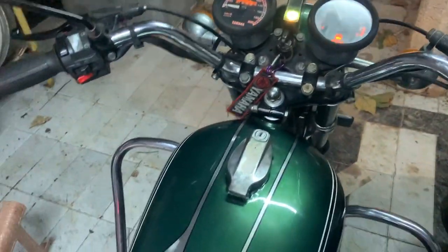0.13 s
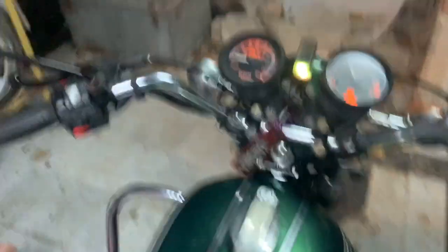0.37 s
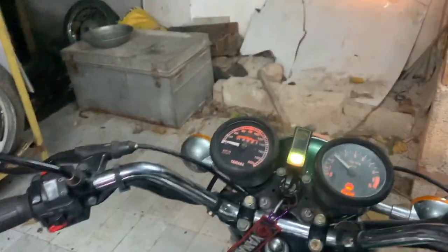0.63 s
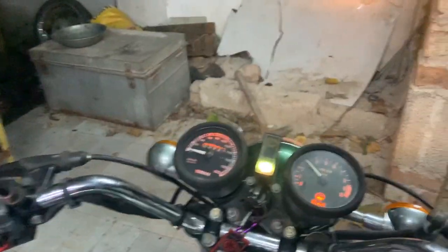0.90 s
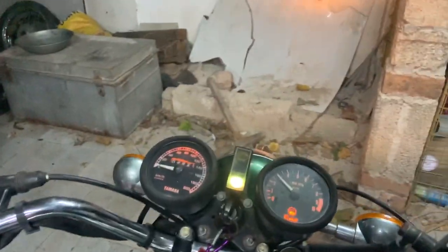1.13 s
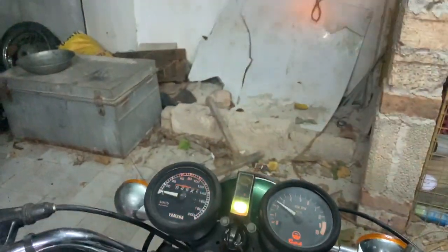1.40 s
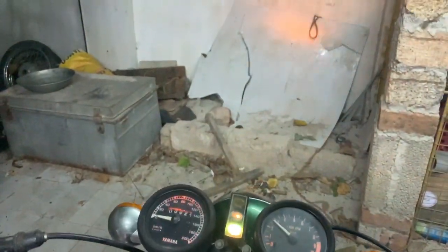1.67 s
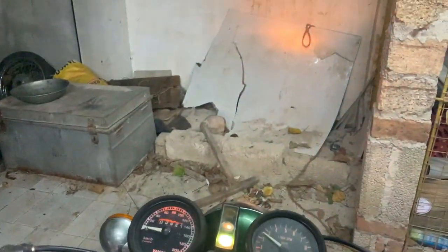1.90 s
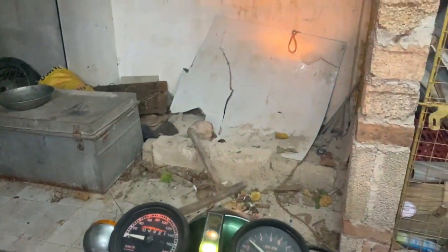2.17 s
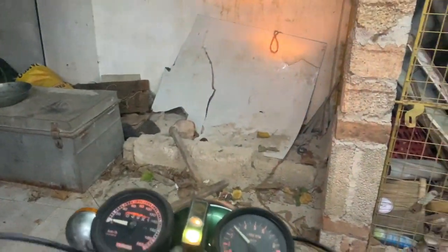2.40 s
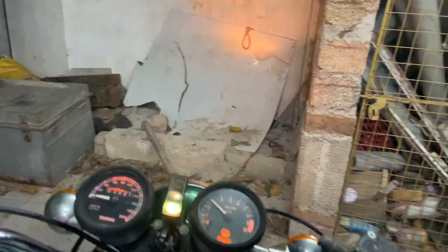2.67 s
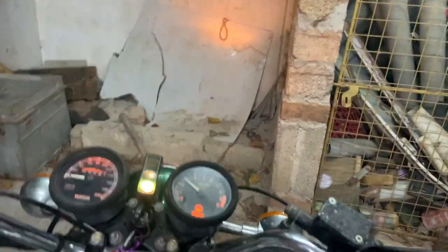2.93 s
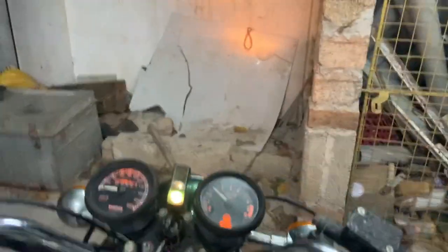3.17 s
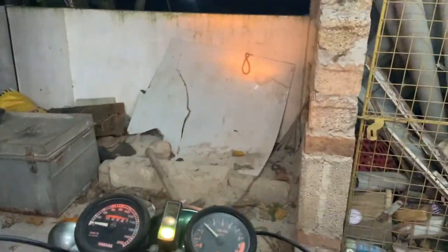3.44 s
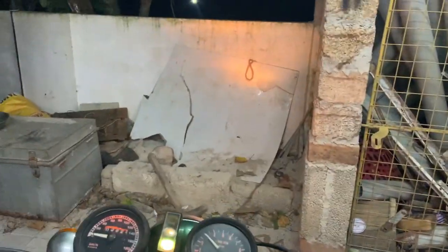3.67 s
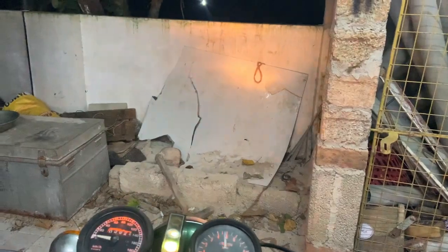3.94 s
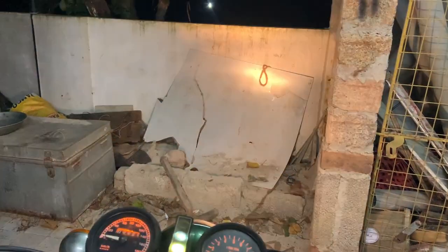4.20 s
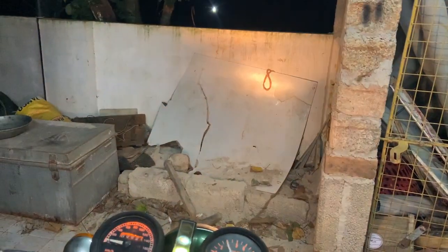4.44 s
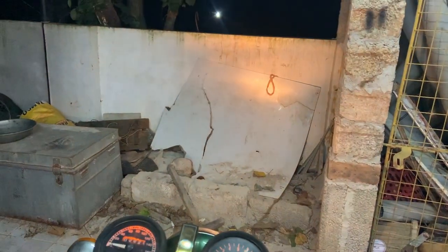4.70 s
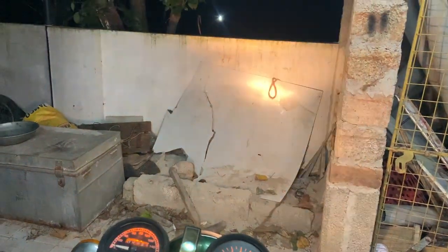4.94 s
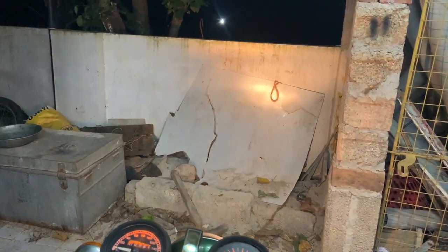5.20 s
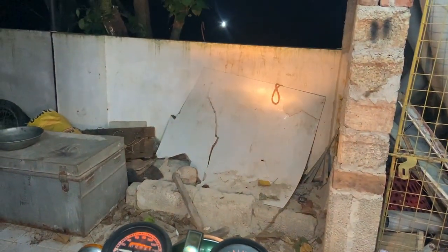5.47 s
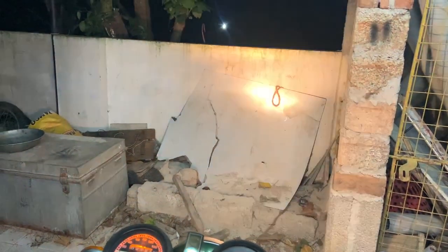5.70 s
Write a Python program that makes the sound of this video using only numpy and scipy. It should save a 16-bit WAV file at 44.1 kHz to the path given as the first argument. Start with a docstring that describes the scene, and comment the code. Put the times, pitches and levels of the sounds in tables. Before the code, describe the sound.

Close to a small two-stroke motorcycle in a walled yard, the engine drops from a brisk idle to a slow, lumpy one with irregular pops, metallic fin rattle and light hiss. Near four seconds the throttle is blipped three times, each a loud barking, rasping surge. A hand-held phone hears it close, with short wall echo and clipping on the peaks.

```python
"""A small single-cylinder two-stroke in a walled yard, close to a hand-held phone, over a low rumble.
From the start it slows: exhaust puffs ring the pipe, slap and chatter shake fins and case, gas jets hiss.
At idle it fires only every few turns: each firing rings the fins, thumps and spits a crack from the tail pipe.
Then three throttle blips: the intake barks in its air box, the exhaust rasps, the fins rattle harder and the
recorder clips; the speed is still high at the end. A short, diffuse yard echo follows throughout."""
import sys
import numpy as np
from scipy import signal
from scipy.fft import rfft, irfft, next_fast_len
from scipy.io import wavfile
from scipy.ndimage import uniform_filter1d, map_coordinates

SR = 44100
rng = np.random.default_rng(int(sys.argv[2]) if len(sys.argv) > 2 else 0)


def boost_factor(decibels):
    """Convert a level in decibels to a linear amplitude factor."""
    exponent = np.asarray(decibels, float) / 20
    return 10 ** exponent


def transcribe(signal):
    """Save signal, clipped to [-1, 1], as a 16-bit WAV file at the path in sys.argv[1]."""
    frames = np.atleast_2d(signal).T
    limited = np.clip(frames, -1, 1)
    pcm = np.round(limited * 32767).astype(np.int16)
    wavfile.write(sys.argv[1], SR, pcm)


N = 257544
IDLE_HZ = 33


def unit(x):
    """Scale to rms 1."""
    return x / np.sqrt(np.mean(x ** 2) + 1e-20)


def along(points, hz, axis=1):
    """A column of (f/Hz, value, ..) points, read on a log frequency axis."""
    points = np.array(points)
    return np.interp(np.log(hz + 1), np.log(points[:, 0] + 1), points[:, axis])


def curves(rows):
    """One value per sample for each column after t/s."""
    s, *cols = np.transpose(rows)
    return [np.interp(np.arange(N) / SR, s, c) for c in cols]


def wobble(rate_hz):
    """A smooth random curve, rate_hz knots a second."""
    coarse = np.arange(0, N + 8, 8)
    knots = rng.standard_normal(int(N * rate_hz / SR) + 4)
    return np.interp(np.arange(N), coarse, map_coordinates(knots, [coarse * rate_hz / SR]))


def filtered(x, response):
    """x times a complex response of frequency."""
    m = next_fast_len(N + SR // 2)
    return irfft(rfft(x, m) * response(np.fft.rfftfreq(m, 1 / SR)), m)[..., :N]


def modes(table, flip=-1):
    """Causal response of resonances; flip = -1 fills the valleys between them, 1 leaves deep notches."""
    def response(f):
        total = 0
        for k, (center, width, db) in enumerate(table):
            damping = 1j * f * width
            total = total + flip ** k * boost_factor(db) * damping / (center * center - f * f + damping)
        return total
    return response


def steady(x):
    """Even out the slow level of x, so that a level curve alone sets it."""
    return x / np.sqrt(np.abs(uniform_filter1d(x ** 2, size=SR // 5)) + 1e-12)


# shaft before the kicks of lone firings: (t/s, f/Hz)
SHAFT_SPEED = [(0, 55.6), (.31, 46.2), (.48, 40.7), (.7, 36.5), (1.19, 32.2), (2.14, 32.4), (2.76, 35.2),
               (3.0, 33), (3.38, 36.5), (3.72, 35), (3.8, 44.3), (3.93, 77.2), (3.99, 90.7), (4.05, 99.4),
               (4.12, 96.8), (4.37, 83.1), (4.44, 81.5), (4.71, 67), (4.76, 72.3), (4.87, 91.2),
               (4.91, 95.3), (4.98, 99.4), (5.12, 96.6), (5.37, 85), (5.53, 75.8), (5.58, 79.3),
               (5.69, 92.7), (5.77, 99.4), (5.84, 96.1)]


def shaft_speed():
    """Shaft turns a second, without the kicks."""
    return curves(SHAFT_SPEED)[0]


def crank(speed_hz, kick_hz, fade_s):
    """Shaft angle in turns: each lone firing speeds the shaft up, a slow shaft most, and drag slows it again."""
    t = np.arange(N) / SR
    kicks = sum((t > s) * np.exp(-np.abs(t - s) / fade_s) for s, *_ in FIRINGS)
    kicks = kicks - uniform_filter1d(kicks, size=SR // 4)
    return np.cumsum(speed_hz + kick_hz * (IDLE_HZ / speed_hz) ** 2 * kicks) / SR


# throttle twists: (t/s, rise/s, held/s, opening 0-1)
TWISTS = [(3.76, 0.13, 0.083, .95), (4.68, 0.061, 0.11, 1.0), (5.44, 0.15, 0.14, .88)]
SNAP_SHUT_S, SAG_SHARE = .1, 0.31


def throttle():
    """Opening 0-1: the grip turns, sags a little while held and snaps shut."""
    t = np.arange(N) / SR
    total = np.zeros(N)
    for s, rise_s, held_s, opening in TWISTS:
        corners = np.cumsum([s, rise_s, held_s, SNAP_SHUT_S])
        total += opening * np.interp(t, corners, [0, 1, 1 - SAG_SHARE, 0])
    return total


# firing falters below MISFIRE_HZ, and when a slow engine gulps air
MISFIRE_HZ, MISFIRE_SPREAD_HZ, CHOKE_HZ = 36.5, 2.5, 38
# (even running, faltering)
SIZE_DB, SLIP_TURNS, TUMBLE_DB = (1.6, 4.2), (.008, .03), (2, 15)


def unevenness():
    """Size scatter/dB, timing scatter/turns and tumbling gas/dB all grow as the firing falters."""
    speed = shaft_speed()
    slow = 1 / (1 + np.exp((speed - MISFIRE_HZ) / MISFIRE_SPREAD_HZ))
    choked = np.sqrt(throttle()) * (CHOKE_HZ / speed) ** 2
    falter = np.clip(slow + choked, 0, 1)
    return [even + (rough - even) * falter for even, rough in (SIZE_DB, SLIP_TURNS, TUMBLE_DB)]


def port_pulses(angle, offset_turns):
    """One puff a turn as a port opens, uneven in size and timing."""
    size_db, slip, _ = unevenness()
    at = np.flatnonzero(np.diff(np.floor(angle + offset_turns))) + 1
    chance = rng.standard_normal((N // 100, 2))[:len(at)]
    period = np.gradient(at)
    when = np.clip(at + chance[:, 0] * slip[at] * period, 0, N - 1).astype(int)
    return np.bincount(when, boost_factor(chance[:, 1] * size_db[at]), N)


# exhaust modes: (f/Hz, level/dB)
PIPE_MODES = [(96, -2), (143, 2), (171, -5.5), (199, -5.5), (281, -1), (335, -1.5), (374, -9.5),
              (400, -18.5), (445, -20.5), (490, -28), (562, -12), (640, -15), (750, -10.5), (870, -5),
              (965, -11)]


def pipe(f):
    """The exhaust rings long in its low modes, shorter in the high ones; little leaves it below the first."""
    lightly_damped = [(hz, 7 + .035 * hz, db) for hz, db in PIPE_MODES]
    return modes(lightly_damped, flip=1)(f) * (1j * f / (1j * f + 62)) ** 3


# exhaust puffs: (t/s, level/dB)
PUFF_LEVEL = [(0, -19.5), (.3, -21), (.7, -22), (1.2, -23), (2.2, -23), (2.5, -19), (3.0, -21), (3.45, -19),
              (3.72, -20.5), (3.95, -9.5), (4.1, -16), (4.36, -18), (4.62, -12), (4.75, -16), (4.94, -8),
              (5.05, -14.5), (5.3, -19.5), (5.5, -14), (5.62, -12.5), (5.77, -7.5), (5.84, -14.5)]
# shape of one turn's flow: (multiple of shaft speed, level/dB)
PUFF_SHAPE = [(1, -5.5), (2, 2.5), (3, -2.5), (4, 1), (5, 0.5), (6, -2), (7, -0.5), (8, -5.5), (9, -14),
              (10, -10), (11, -11.5), (12, -10), (13, -17), (14, -6.5)]
# tail pipe under load: (f/Hz, width/Hz, level/dB)
RASP_MODES = [(1273, 97, -3), (1394, 50, 1), (1654, 150, 2.5), (2084, 53, -1.5)]


def exhaust(angle, rasp_db):
    """Each turn's flow rings the pipe, with tumbling gas when uneven; under load its sharp front rasps."""
    size_db, slip, tumble_db = unevenness()
    shaky = 2 * np.pi * (angle + slip * wobble(30))
    flow = np.zeros(N)
    for k, db in PUFF_SHAPE:
        # flow shape changes turn to turn: every multiple wavers on its own
        own_level = boost_factor(size_db * wobble(12))
        flow += boost_factor(db) * own_level * np.cos(k * shaky + .3 * size_db * wobble(9))
    flow *= boost_factor(.5 * size_db * wobble(18))
    dull_noise = filtered(rng.standard_normal(N), lambda f: boost_factor(3) / (1 + 1j * f / 260) ** 2)
    tumble = boost_factor(tumble_db) * dull_noise
    fronts = port_pulses(angle, 0) + boost_factor(-36) * rng.standard_normal(N)
    rasp = boost_factor(rasp_db) * steady(filtered(fronts, modes(RASP_MODES)))
    puff_db = curves(PUFF_LEVEL)[0]
    return filtered(np.sqrt(2) * boost_factor(puff_db) * (flow + tumble), pipe) + rasp


# cooling fins: (f/Hz, width/Hz, level/dB)
FIN_MODES = [(925, 78, -6), (1020, 90, -4), (1207, 75, -2), (1338, 78, -10.5), (1737.5, 22.7, 2),
             (1865, 33, 1.5), (1932, 200, -2.5), (2320, 136, -7.5), (2640, 170, -10), (3080, 160, -18.5),
             (3760, 96, -41)]
# broad case clatter, spectrum shape: (f/Hz, level/dB)
CASE_SPECTRUM = [(300, -61), (520, -6), (900, -6), (1300, -11.5), (2000, -15.5), (2500, -15.5),
                 (4000, -21.5), (6000, -30.5)]


def rattle(angle, speed_hz, level_db):
    """Piston slap and gear chatter, swelling once a turn, shake the case; at speed the fins ring more."""
    beat = boost_factor(2 * np.cos(2 * np.pi * angle) + 0.74 * wobble(24.88) + 3.13 * wobble(120))
    ring = unit(filtered(beat * rng.standard_normal(N), modes(FIN_MODES)))
    broad = unit(filtered(beat * rng.standard_normal(N), lambda f: boost_factor(along(CASE_SPECTRUM, f))))
    slap = unit(filtered(port_pulses(angle, .7), modes(FIN_MODES)))
    fins = unit(ring + boost_factor(-5) * slap)
    fin_share = np.clip(0.32 + 0.0073 * (speed_hz - 35), .05, .95)  # of the power
    return boost_factor(level_db) * (np.sqrt(fin_share) * fins + np.sqrt(1 - fin_share) * broad)


# jet noise, spectrum shape: (f/Hz, level/dB)
JET_SPECTRUM = [(1500, -2), (3000, 3.5), (5000, 1.5), (7000, 0.5), (10000, 1), (13000, -5.5), (15700, -8)]


def hiss(angle, level_db):
    """Gas jets from the tail pipe once a turn, fluttering."""
    beat = boost_factor(0.44 * np.cos(2 * np.pi * (angle - .2)) + 0.36 * wobble(9.5) + 1.46 * wobble(150))
    return boost_factor(level_db) * unit(filtered(beat * rng.standard_normal(N), lambda f: boost_factor(along(JET_SPECTRUM, f))))


# far neighbourhood, spectrum shape: (f/Hz, level/dB)
RUMBLE_SPECTRUM = [(20, -30), (35, -13.5), (60, 8), (85, 53), (130, -49)]


def rumble():
    """Low background noise, mostly alike at both ports."""
    shared, own = rng.standard_normal(N), rng.standard_normal((2, N))
    return boost_factor(-63.0) * unit(filtered(shared + .5 * own, lambda f: boost_factor(along(RUMBLE_SPECTRUM, f))))


# left port ahead of right: (f/Hz, phase/rad)
PORT_LEAD = [(0, 0), (330, .15), (700, 1.3), (1400, -.4), (2400, 2), (3300, 1.5), (4750, 3.14),
             (6720, 6.28), (16000, 19.7)]
# left minus right: (f/Hz, level/dB)
PORT_TILT = [(330, 0), (600, 2), (1170, 2.5), (1900, 1), (5000, 0)]


def two_ports(x):
    """Phase and level differ between the left and right port, half of it on each."""
    side = np.array([[.5], [-.5]])

    def response(f):
        lead = np.interp(f, *np.transpose(PORT_LEAD))
        return np.exp(1j * side * lead) * boost_factor(side * along(PORT_TILT, f))
    return filtered(x, response)


# echo against direct sound: (f/Hz, level/dB, t60/s)
YARD_ECHO = [(100, -30, .15), (300, -14, .15), (600, 1, .15), (900, 2, .15), (2500, -1, .12),
             (4500, -9, .1), (15000, -9, .08)]


def yard(x):
    """Walls and floor give a short, diffuse answer, different at the two ports."""
    # random tail redrawn every fifth of a second, so no fixed comb stands out
    hop, delay = SR // 5, 200  # samples
    wet, x = np.zeros((2, N + SR)), np.pad(x, (hop, 2 * hop))
    for start in range(0, N + hop, hop):
        hz, t, z = signal.stft(rng.standard_normal((2, SR // 4)), SR, nperseg=256)
        fall = boost_factor(-60 * t / along(YARD_ECHO, hz, axis=2)[:, None])
        fall = fall / np.linalg.norm(fall, axis=1, keepdims=True)
        tail = signal.istft(z * fall, SR, nperseg=256)[1]
        piece = x[start:start + 2 * hop] * np.hanning(2 * hop)
        answer = signal.fftconvolve(piece[None], tail / np.linalg.norm(tail[0]), axes=1)
        wet[:, start:start + answer.shape[1]] += answer
    return filtered(wet[:, hop - delay:][:, :N], lambda f: boost_factor(along(YARD_ECHO, f)))


# lone firings: (t/s, level/dB)
FIRINGS = [(0.2535, -16.5), (0.3886, -21.5), (0.72, -22.5), (0.8158, -18), (0.859, -20), (1.002, -20.5),
           (1.099, -20), (1.3735, -14.5), (1.585, -16.5), (1.8016, -29), (1.9127, -22), (1.952, -16.5),
           (2.1344, -15.5), (2.2847, -14), (2.4562, -12), (2.6257, -16.5), (2.7023, -17.5), (2.7596, -23.5),
           (2.915, -15), (3.061, -10), (3.2296, -16), (3.404, -11.5), (3.619, -14.5), (3.7564, -10.5),
           (3.8313, -8.5), (3.8696, -6), (3.92, -12), (3.999, -12), (4.39, -16), (4.7342, -5),
           (5.3366, -14.5), (5.5098, -19)]
# crack of a burn, spectrum shape: (f/Hz, level/dB)
SPIT_SPECTRUM = [(1500, -27), (3000, 1.5), (6000, 1.5), (11000, 2.5), (15700, -5)]


def firings():
    """A burn rings the fins and thumps air box and pipe; 8 ms later gas spits from the tail pipe."""
    spit, ring, thump = np.zeros(N + SR), np.zeros(N + SR), np.zeros(N + SR)
    t = np.arange(SR // 5) / SR
    fast, slow = boost_factor(-60 * t / 0.07), boost_factor(-6.5 - 60 * t / 0.26)
    shape = (1 - np.exp(-t / 0.0019)) * (fast + slow)
    for s, db in FIRINGS:
        i, early = round(s * SR), round((s - .008) * SR)
        spit[i:i + len(t)] += boost_factor(db - 7.0) * shape
        ring[early:early + len(t)] += boost_factor(db - 7) * shape
        thump[early] += boost_factor(.45 * db + 14)  # varies less than the crack
    flutter = boost_factor(1.9 * wobble(500))
    gas = unit(filtered(flutter * rng.standard_normal(N), lambda f: boost_factor(along(SPIT_SPECTRUM, f))))
    fins = unit(filtered(rng.standard_normal(N), modes(FIN_MODES)))
    body = filtered(thump[:N], lambda f: modes(AIRBOX_MODES)(f) + boost_factor(-14) * pipe(f))
    return spit[:N] * gas + ring[:N] * fins + body


# intake: (f/Hz, width/Hz, level/dB)
AIRBOX_MODES = [(286.5, 38.5, 1), (335.2, 20, 4.5), (404.3, 55, -4), (463, 78.5, -2.5), (515, 29, -8),
                (607, 18, -17.5)]


def intake_bark(angle, bark_db):
    """With the throttle open each gulp of air barks in the air box."""
    gulps = port_pulses(angle, 0.4034)
    bark = filtered(gulps, lambda f: modes(AIRBOX_MODES)(f) * (1j * f / (1j * f + 220)) ** 2)
    return boost_factor(bark_db) * steady(bark)


BURN_LAG_S = 0.07  # burn behind the air
NEARING_DB_PER_S, NEAR_S = 1.99, 2.01  # the hand brings the phone closer until NEAR_S


def scene():
    """Speed, throttle and load drive bark, rasp, rattle and hiss; ports, yard and rumble complete the mix."""
    speed = shaft_speed()
    opening, keep = throttle(), np.exp(-1 / (BURN_LAG_S * SR))
    load = signal.lfilter([1 - keep], [1, -keep], opening)
    octaves = np.log2(speed / IDLE_HZ)
    near_db = NEARING_DB_PER_S * np.minimum(np.arange(N) / SR - NEAR_S, 0)

    def driven_db(idle_db, push_db, push, per_octave_db):
        """Level of shut idle, plus throttle or load, plus speed, plus nearness."""
        return idle_db + push_db * push + per_octave_db * octaves + near_db

    rasp_db = driven_db(-50, 17.5, load, per_octave_db=16.5)
    rattle_db = driven_db(-27, 8, load, per_octave_db=3.5)
    hiss_db = driven_db(-36.5, 9, load, per_octave_db=8.5)
    bark_db = driven_db(-33, 32.5, np.sqrt(opening), per_octave_db=-0.5)
    angle = crank(speed, kick_hz=3.5, fade_s=0.083)
    engine = exhaust(angle, rasp_db) + rattle(angle, speed, rattle_db) + hiss(angle, hiss_db)
    engine = engine + firings() + intake_bark(angle, bark_db)
    # direct plus echo keeps the engine's power
    share = lambda f: 1 / np.sqrt(1 + boost_factor(2 * along(YARD_ECHO, f)))
    return filtered(two_ports(engine) + yard(engine), share) + rumble()


def band_limit(x):
    """A steep low-pass at the top of the band."""
    return signal.sosfilt(signal.butter(12, 16780, fs=SR, output="sos"), x)


def record(dry):
    """The phone clips, with a rounded knee, near full scale and keeps nothing above its band limit."""
    clipped = dry / (1 + np.abs(dry / .98) ** 8) ** (1 / 8)
    band_limited = filtered(clipped, lambda hz: hz < 15750)
    return band_limit(band_limited)


dry = scene()
out = record(dry)
transcribe(out)
```